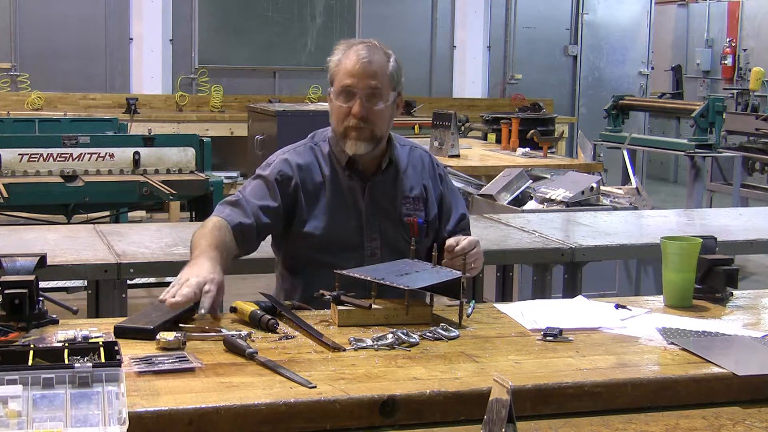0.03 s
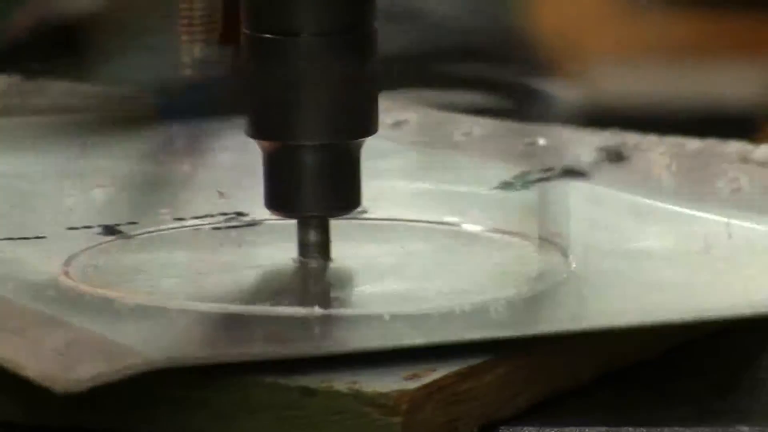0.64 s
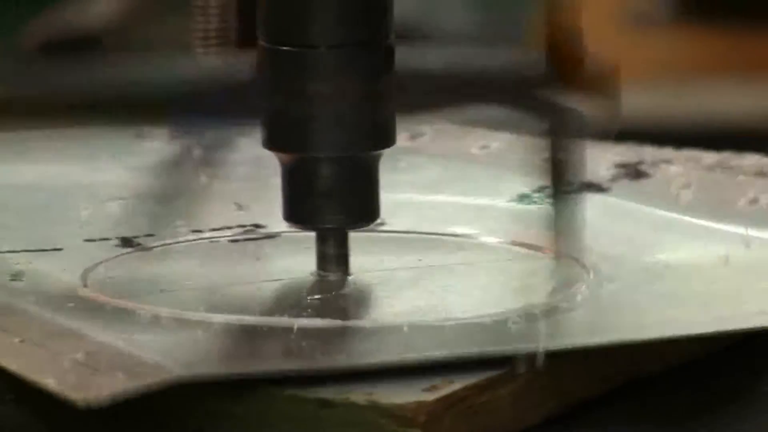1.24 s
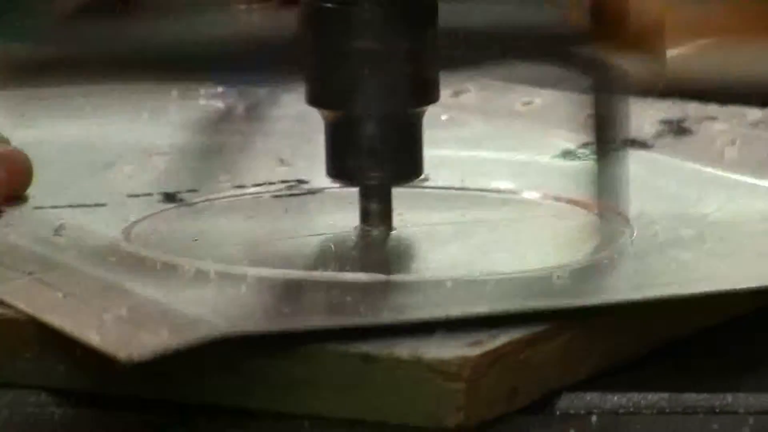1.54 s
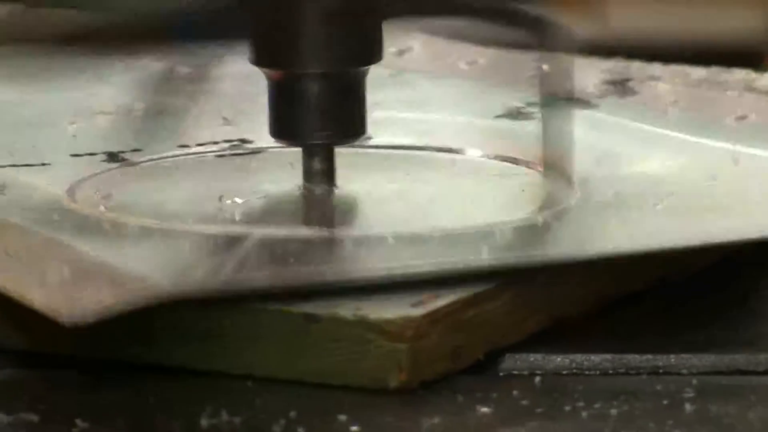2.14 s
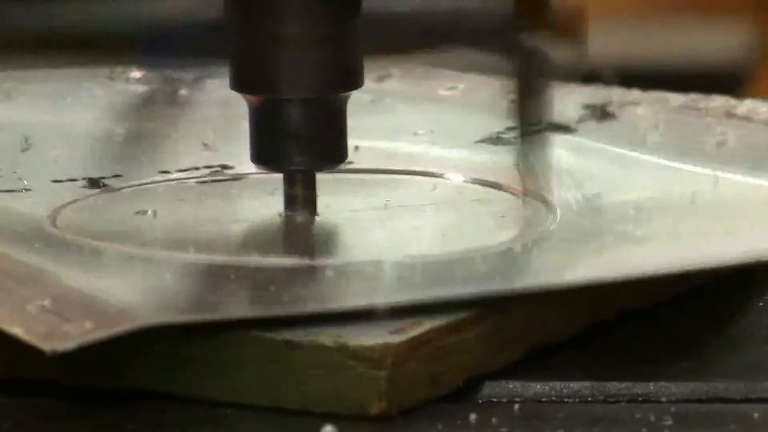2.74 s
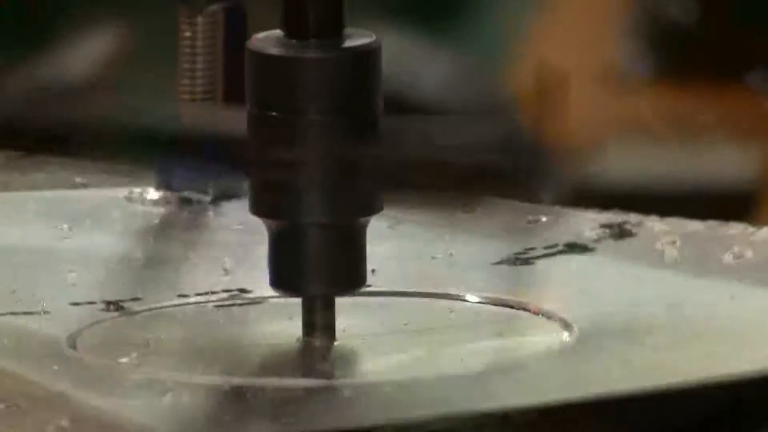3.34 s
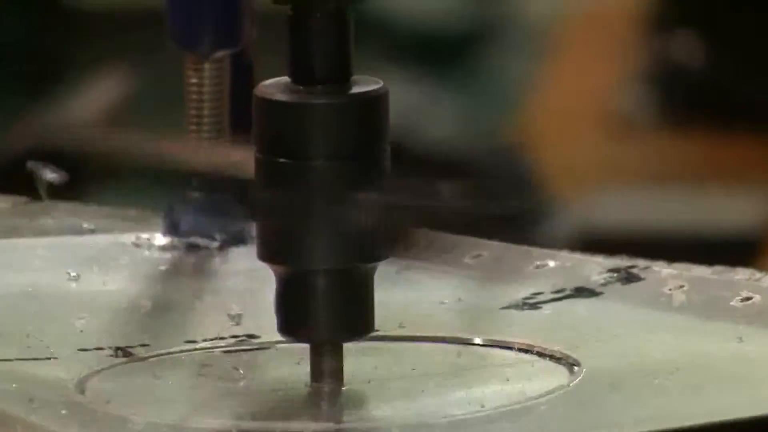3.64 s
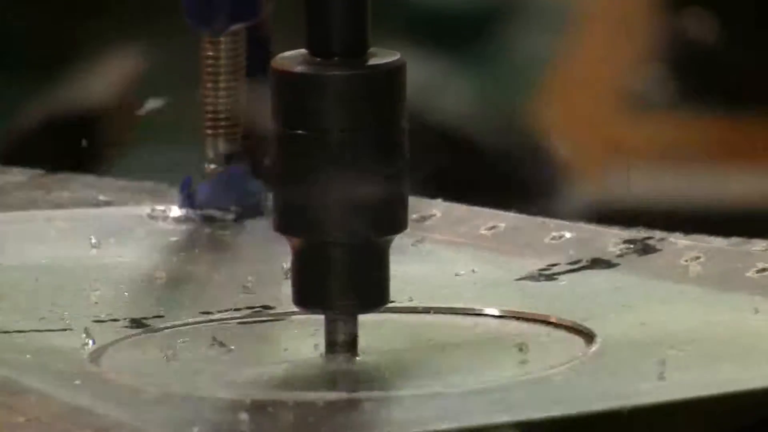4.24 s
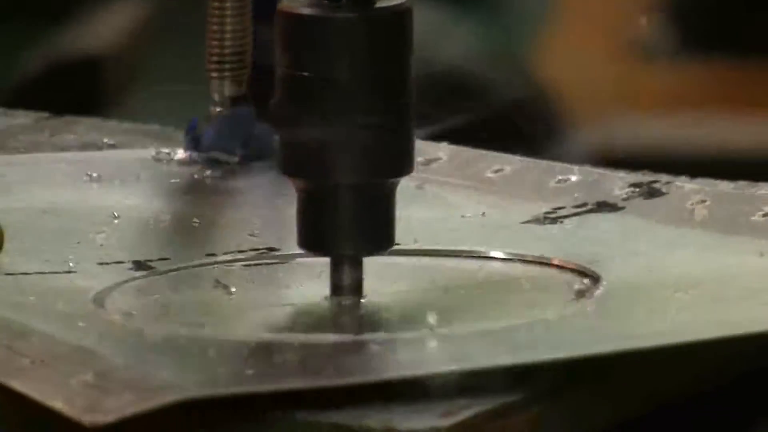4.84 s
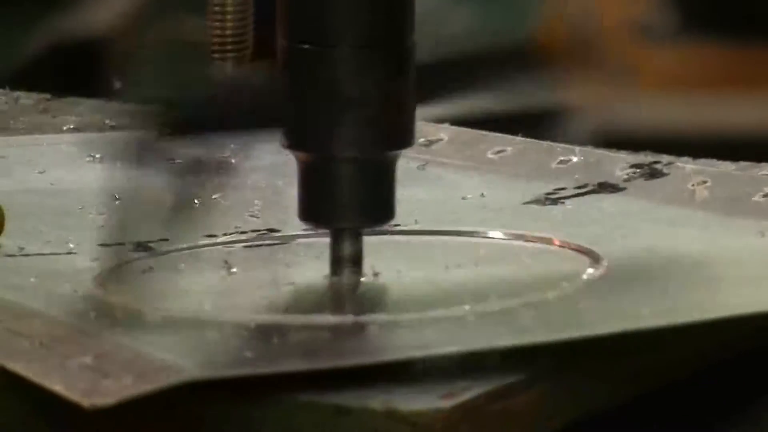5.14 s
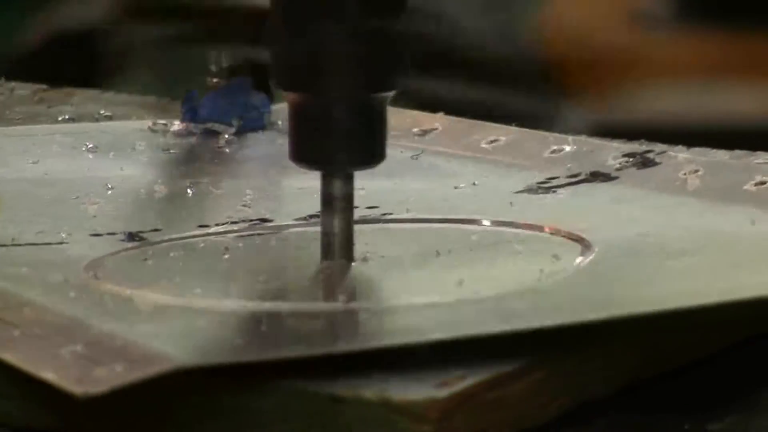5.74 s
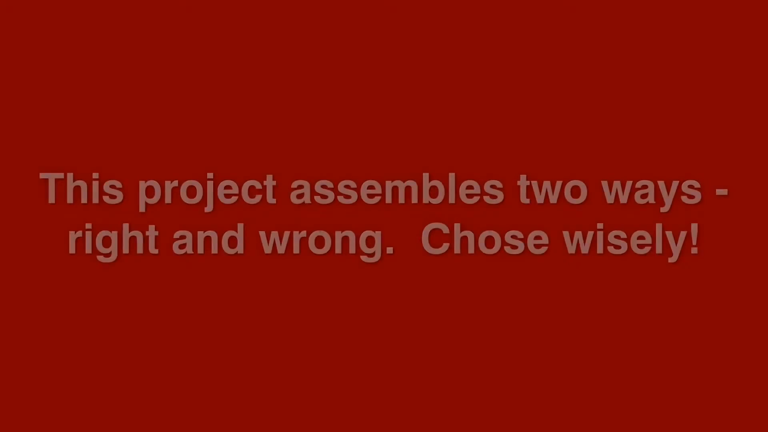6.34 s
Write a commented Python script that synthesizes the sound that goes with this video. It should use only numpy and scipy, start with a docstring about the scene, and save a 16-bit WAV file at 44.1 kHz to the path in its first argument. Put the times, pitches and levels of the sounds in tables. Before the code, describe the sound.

A faint electrical hum fills a workshop until, at about 0.4 seconds, a drill press comes in with a low rumble. At 0.5 seconds its cutter bites into a metal sheet and a loud, high-pitched squeal begins, close up. The squeal holds nearly one pitch and pulses about ten times a second, once with each turn. Beneath it are rasping, spurts of hissing chips, faint ringing from the sheet and the rattling machine. A sharp crackle comes at 3.7 seconds and a smaller one at 4.8. Just after 5 seconds the cutter breaks through and the squeal stops. From 5.1 to 5.6 seconds burrs rip off in bright crackles while the sheet chatters and the rumble grows much louder. The loose disc scrapes lightly several times between 5.6 and 6 seconds. The press keeps humming and rattling, then cuts off at 6.3 seconds.

```python
"""Fly cutter through sheet metal

A workshop hums with the mains, then a drill press starts and its fly cutter bites into a metal sheet.
The bit grabs at the same places of the groove on every turn and squeals at its own resonance, scraping
off chips. It breaks through: the squeal stops, burrs tear off, the sheet chatters, the loose disc rubs,
and the press rumbles on until the sound cuts off."""
import sys
import numpy as np
from scipy import signal
from scipy.fft import rfft, irfft
from scipy.io import wavfile

SR = 44100
rng = np.random.default_rng(int(sys.argv[2]) if len(sys.argv) > 2 else 0)


def dump(signal):
    """Clip the signal to [-1, 1] and save it as 16-bit WAV at the path in sys.argv[1]."""
    limited = np.clip(np.atleast_2d(signal).T, -1, 1)
    pcm = np.round(limited * 32767).astype(np.int16)
    wavfile.write(sys.argv[1], SR, pcm)


N = 286020
T = np.arange(N) / SR
HZ = np.maximum(np.fft.rfftfreq(N, 1 / SR), 1)
START_S, END_S = .411, 6.317   # the press runs
BITE_S, SQUEAL_END_S = .495, 5.065   # the bit bites; it breaks through

# The bit's three grabs per turn as the groove deepens: t/s, snap place/turns, snap level/dB,
# swell place/turns, swell width/turns, swell level/dB, far flare place/turns, far flare level/dB
GRABS = [(.55, .275, -8, .62, .3, -13.5, .94, -11), (1.0, .28, -10, .5, .28, -15, .857, -9),
         (1.3, .228, -9, .49, .18, -9, .876, -7.5), (1.7, .228, -7, .42, .14, -11.5, .85, -10),
         (2.1, .335, -7.5, .44, .22, -12, .875, -10), (2.3, .348, -5, .555, .08, -10.5, .894, -15.5),
         (3.0, .311, -3.5, .51, .06, -8.2, .85, -18), (4.15, .305, -6, .44, .08, -8, .92, -28),
         (4.45, .275, -8, .37, .09, -8.5, .956, -9.5), (5.03, .265, -6, .345, .1, -7.5, .917, -17)]
# Bright spectrum of chips and burrs leaving the edge: f/Hz, level/dB
CHIP_SPECTRUM = [(1500, -18.5), (3000, -2), (4500, 2), (5600, -2), (7000, 0.5), (9000, 0), (12000, -6.5),
                 (16000, -9.5)]


def from_db(db):
    """Decibels to gain."""
    return 10 ** (np.asarray(db) / 20)


def rms_one(x):
    """Scale to unit power."""
    return x / np.sqrt(np.mean(x ** 2) + 1e-20)


def in_time(rows):
    """Each column of a breakpoint table as a curve over time."""
    times, *columns = np.transpose(rows)
    return [np.interp(T, times, column) for column in columns]


def over_hz(points):
    """A breakpoint table as a curve over log frequency."""
    hz, value = np.transpose(points)
    return np.interp(np.log(HZ), np.log(hz), value)


def ramp(x):
    """A linear fade, held between zero and one."""
    return np.clip(x, 0, 1)


def between(start, end):
    """A gate with millisecond edges."""
    return ramp((T - start) * 1000) * ramp((end - T) * 1000)


def bell(x, width):
    """A smooth hump of height one around zero."""
    return np.exp(-(x / width) ** 2)


def stroke(start_s, length_s):
    """A short envelope with a fast attack and a rounded decay."""
    age = np.maximum(T - start_s, 0) / length_s
    return (1 - np.exp(-10 * age)) * np.exp(-age ** 2)


def drift(rate_hz):
    """Smooth random modulation of unit power, moving at about this rate."""
    return rms_one(irfft(rfft(rng.standard_normal(N)) / (1 + (HZ / rate_hz) ** 2), N))


def pan(db):
    """Left and right gains for a level difference; positive leans left."""
    return from_db(np.array([[db], [-db]]) / 2)


def noise():
    """Two independent white noises."""
    return rng.standard_normal((2, N))


def grains(per_s, spread_db):
    """Two independent trains of random clicks of uneven size."""
    sizes = from_db(spread_db * np.minimum(rng.exponential(1, (2, N)), 4))
    return rms_one(sizes * rng.choice([-1, 1], (2, N)) * (rng.random((2, N)) < per_s / SR))


def resonances(modes):
    """Response of damped modes in parallel, alternating in sign; rows of f/Hz, width/Hz, level/dB."""
    return sum((-1) ** k * from_db(db) / (1 + 1j * (HZ ** 2 - hz ** 2) / (HZ * width))
               for k, (hz, width, db) in enumerate(modes))


def radiate(force, response):
    """Two forces through one response, spread in stereo as mid and side; unit power."""
    # How alike the channels are: f/Hz, coherence/ratio
    coherence = [(60, 1), (600, 0.93), (1200, 0.8), (3000, 0.58), (12000, 0.25)]
    # Stereo balance: f/Hz, left minus right/dB
    balance = [(60, -19.5), (150, -4), (600, -1.3), (3000, -3), (15000, -1)]
    # Phase lead of the left channel: f/Hz, lead/rad
    left_lead = [(60, 4), (120, 1.5), (290, 0.69), (640, 0)]
    mid, side = rfft(force) * response
    alike = ramp(over_hz(coherence))
    pair = np.sqrt(1 + alike) * mid + np.sqrt(1 - alike) * side * [[1], [-1]]
    lean = from_db(over_hz(balance) / 2) * np.exp(.5j * over_hz(left_lead))
    return rms_one(irfft(pair * [lean, 1 / lean], N))


def workshop_reverb(x, t60):
    """Dense reflections that die away, different on each side."""
    t = T[:SR // 2]
    tails = rng.standard_normal((2, len(t))) * from_db(-60 * t / t60) * (t > .003)
    tails /= np.linalg.norm(tails, axis=1, keepdims=True)
    return signal.fftconvolve(x, tails, axes=1)[:, :N]


def turns_after(place):
    """Turns since the bit passed this place of the groove; negative as it approaches."""
    turn_s, turn_zero_s = .0995, .5185
    return ((T - turn_zero_s) / turn_s - place + .5) % 1 - .5


def since_snap():
    """Turns since the snap that opens the main grab."""
    return turns_after(in_time(GRABS)[0])


def quiet_shop(air_db, buzz_db):
    """Room tone before the press starts: mains hum, a thin buzz on every half cycle, and faint air."""
    # Hum lines: f/Hz, level/dB
    hum_lines = [(136, -54.5), (241, -42), (360.7, -50), (479.1, -52)]
    # Spectrum of the air noise: f/Hz, level/dB
    air_spectrum = [(30, -17), (100, -8), (137, 3), (190, -3.5), (1500, -18.5), (5700, -20), (8500, -33),
                    (15500, -34)]
    hum = sum(np.sqrt(2) * from_db(db) * np.sin(2 * np.pi * (hz * T + rng.random()))
              for hz, db in hum_lines)
    ticks = np.diff(np.floor(120 * T), prepend=0)
    buzz = rms_one(signal.sosfilt(signal.butter(2, [700, 5800], "band", fs=SR, output="sos"), ticks))
    buzz = rms_one(workshop_reverb(np.array([buzz, buzz]), t60=.13))
    air = rms_one(irfft(rfft(noise()) * from_db(over_hz(air_spectrum)), N))
    return (hum * pan(-5.5) + from_db(buzz_db) * buzz + from_db(air_db) * air) * between(0, START_S)


def press(rumble_db, table_db, motor_db, whine_db, knock_db, load_db, loose_db):
    """The motor hums; belt and spindle rattle the table and the sheet in small uneven knocks."""
    # Shaking of press and sheet from the bite on: t/s, level/dB
    shake = [(0.52, -37), (0.84, -30.5), (1.76, -36), (2.54, -31.5), (3.7, -33.5), (4.1, -28.5),
             (5.05, -29.5), (5.215, -16), (6.29, -22.5)]
    # Spectrum of the rumble: f/Hz, level/dB
    rumble_spectrum = [(30, -62), (122, -7.5), (167, -7.5), (355, -13.5), (629, -15), (1000, -25.5),
                       (1200, -17), (1650, -22.5), (4200, -35.5), (4540, -31), (15000, -63)]
    # Press table and clamped sheet: f/Hz, width/Hz, level/dB
    table_modes = [(138.4, 14, -0.5), (212.5, 7, 8), (234.8, 15, 6), (282, 47, 8), (572.7, 7.9, 6),
                   (705, 23, 3.5), (923.6, 37, -3.5), (1203, 16.5, -1.5)]
    # Motor hum: f/Hz, level/dB
    motor_lines = [(74.4, -17.5), (119.8, -0.5), (180, -15), (629.5, -11)]
    # The sheet, ringing loosely once cut through: f/Hz, width/Hz, level/dB
    loose_modes = [(452.4, 11, 0), (630, 24, 0), (1187, 7.3, -4), (1228, 9.8, -6)]
    # Whine of the spindle bearings: f/Hz, width/Hz, level/dB
    bearing_modes = [(5270, 25, -2.5), (6557, 25, -1.5)]
    idle_db = -20.5
    level_db = np.where(T < BITE_S, idle_db, in_time(shake)[0]) + .53 * duck_db() * (T > BITE_S)
    knocks = grains(1100, 3.86) * from_db(knock_db * drift(46))
    # soft knocks carry the bass, the smooth rush of belt and bearings the treble
    lowpass = 1 / (1 + (HZ / 1800) ** 2) ** 2
    force = irfft(rfft(knocks) * lowpass + rfft(noise()) * np.sqrt(1 - lowpass ** 2), N)
    rumble = from_db(rumble_db) * radiate(force, from_db(over_hz(rumble_spectrum)))
    table = from_db(table_db) * radiate(knocks, resonances(table_modes))
    # the clamped sheet drums while the bit bears on it
    load = from_db(load_db) * ramp((5.35 - T) / .27)
    drum = load * radiate(grains(1500, 5.6), resonances([(245.5, 171, 0)]) ** 2)
    hum = sum(from_db(db + 2 * drift(1.5)) * np.sin(2 * np.pi * hz * T + .5 * drift(3.08))
              for hz, db in motor_lines)
    loose = from_db(loose_db) * ramp((T - 5.15) / .55) * radiate(noise(), resonances(loose_modes))
    # the hum stands out before and after the cut, when the press runs free
    free_db = 5 * (ramp((T - 5.4) / .54) + (T < BITE_S))
    motor = from_db(motor_db + free_db) * radiate(np.array([hum, np.zeros(N)]), 1)
    whine = from_db(whine_db) * radiate(noise(), resonances(bearing_modes))
    return from_db(level_db) * (rumble + table + drum + loose + motor + whine) * between(START_S, END_S)


def duck_db():
    """Scrape and rumble duck once a turn under the loud squeal, most of all midway through the cut."""
    depth_db = (4 + 4 * bell(T - 3, .83)) * between(BITE_S, SQUEAL_END_S)
    dip = bell(((since_snap() - .15) / .2) ** 2, .83)   # flat-topped, just after the snap
    return depth_db * (.35 - dip)


def sticking(dip_db=7, width_turns=.07):
    """The bit sticks and falls quieter just before each snap."""
    return from_db(-dip_db * bell(since_snap() + width_turns, width_turns))


def grip(uneven_db):
    """Envelope of the bit's vibration in each turn: a snap, a swell, and a flare on the far side."""
    _, snap_db, swell_place, swell_width, swell_db, far_place, far_db = in_time(GRABS)
    rise_turns, fall_turns, far_turns = .022, .034, .07
    age = since_snap()
    snap = from_db(snap_db + uneven_db * drift(7.1)) * bell(age, np.where(age < 0, rise_turns, fall_turns))
    swell = from_db(swell_db + uneven_db * drift(7.1)) * bell(turns_after(swell_place), swell_width)
    far = from_db(far_db + uneven_db * drift(7)) * bell(turns_after(far_place), far_turns)
    # in the shallow groove the bit never quite stops squealing
    shallow = from_db(-20.5) * ramp((2.76 - T) / .63)
    first_squeak = from_db(-10) * bell(T - BITE_S, .01)
    sustain = np.hypot(swell, shallow) * sticking()
    return np.sqrt(snap ** 2 + far ** 2 + first_squeak ** 2 + sustain ** 2)


def squeal(jitter_hz, flutter_db, sway_rad, limit_db, room_db):
    """Stick-slip of the bit: one high tone, bent once a turn, with overtones when it swings hard."""
    # Base pitch of the squeal: t/s, f/Hz
    pitch = [(0.52, 3845), (1.2, 3800), (1.8, 3863), (2.18, 3870), (2.3, 3794), (3.9, 3826), (5.0, 3855)]
    # Overtones: multiple of the pitch, level/dB, left minus right/dB
    overtones = [(2, -13.5, -3), (3, -24.5, 0.5), (4, -33.5, -4)]
    # Raggedness of each overtone: phase jitter/rad
    overtone_jitter = [.28, .95, .85]
    age, biting = since_snap(), between(BITE_S, SQUEAL_END_S)
    drive = grip(uneven_db=.23) * biting
    bend_hz = 3.7 + 26.4 * np.cos(2 * np.pi * (age + .27))   # high before the grab, sagging in it
    bend_hz += 135 * bell(age + .11, .08)   # flicks up as the bit is about to catch
    bend_hz += 55 * bell(drive, .14) * drift(118)   # wavers when the swing is too weak to lock it
    phase = 2 * np.pi * np.cumsum(in_time(pitch)[0] + bend_hz + jitter_hz * drift(66)) / SR
    # the tone stutters until the groove guides the bit; a soft limit keeps the squeal's peaks even
    stutter_db = flutter_db + 3 * bell(T - BITE_S, 1.4)
    swing = from_db(limit_db) * np.tanh(drive * from_db(stutter_db * drift(180) - limit_db))
    # the whirling arm keeps changing the sound's path to each side
    paths = np.array([from_db(flutter_db * drift(100)) * np.exp(1j * sway_rad * drift(33))
                      for side in range(2)])
    tone = swing * np.real(paths * np.exp(1j * phase)) * pan(-7.5)
    # strain lifts the overtones between snap and swell, most in the deep groove
    strain_db = -14 + 4.5 * bell(T - 3.6, .8)
    strain = np.hypot(swing, from_db(strain_db) * bell(age - .11, .085) * biting)
    for (multiple, db, side_db), jitter in zip(overtones, overtone_jitter):
        overtone = from_db(3.7 * drift(180)) * np.exp(1j * (multiple * phase + jitter * drift(230)))
        tone += from_db(db) * strain * np.real(paths * overtone) * pan(side_db)
    return tone + lingering_ring() + from_db(room_db) * workshop_reverb(tone, t60=.18)


def lingering_ring():
    """A steady ring near 3.9 kHz lingers between squeals and fades after the breakthrough."""
    # Envelope of the ring: t/s, level/dB
    ring_levels = [(.5, -20.5), (5.02, -22.5), (5.08, -27.5), (5.35, -27), (6.0, -47)]
    # Peaks of the ring: f/Hz, width/Hz, level/dB
    ring_peaks = [(3880, 52.4, 2), (3792, 55, -5.5), (3983, 140, -11.5), (3665, 230, -11)]
    envelope = from_db(in_time(ring_levels)[0]) * between(BITE_S, END_S) * sticking()
    return envelope * radiate(grains(2500, 5.1), resonances(ring_peaks)) * pan(-2.7)


def scrape(rasp_db, hiss_db, rough_db):
    """Chips shear off in clumps of tiny snaps: a rasp from the sheet, a hiss from the edge."""
    # While the groove is cut: t/s, rasp level/dB, hiss level/dB
    cutting = [(0.52, -36, -39.5), (0.65, -37.5, -42), (0.9, -31.5, -39), (1.97, -39.5, -44),
               (2.37, -33, -42.5), (4.33, -36, -45), (5.03, -35, -44)]
    # While the disc tears free: t/s, rasp level/dB, hiss level/dB
    breakthrough = [(5.12, -31.5, -36.5), (5.35, -35, -27.5), (5.75, -28.5, -46.5)]
    # Spectrum of the scraped sheet: f/Hz, level/dB
    rasp_spectrum = [(290, -34), (500, -4), (634, -1.5), (754, -7), (986, -12), (1810, -4), (2310, -14.5),
                     (3300, -7), (4290, -19), (7260, -120)]
    rasp_level, hiss_level = in_time(np.vstack([cutting, breakthrough]))
    duck = duck_db()
    # each main grab opens with a spurt of chips; spurts grow and chips coarsen as the groove deepens
    spurt_db = 2 * T * bell(since_snap(), .13) * between(BITE_S, SQUEAL_END_S)
    force = grains(9000, 2.74) * from_db(rough_db * np.clip(T / 4, .5, 1.05) * drift(85))
    rasp = radiate(force, from_db(over_hz(rasp_spectrum)))
    rasp *= from_db(rasp_level + rasp_db + duck + .91 * spurt_db)
    hiss = radiate(force, from_db(over_hz(CHIP_SPECTRUM)))
    hiss *= from_db(hiss_level + hiss_db + .056 * duck + spurt_db)
    # the hiss ends when the disc parts from the sheet; its rim rasps a little longer
    parted_s, last_chip_s = 5.7, 6.046
    hiss *= ramp((parted_s - T) / .87)
    return (rasp + hiss) * between(BITE_S, END_S) * ramp((last_chip_s - T) / .23)


def sheet_song(mode_q):
    """The bit bows one resonance of the sheet after another; each swells once a turn."""
    # Bowed resonances: loudest t/s, spread/s, f/Hz, level/dB, place/turns
    bowed_modes = [(1.05, 0.52, 1820, -35.5, 0), (2.7, 0.27, 650, -31.5, 0.051),
                   (2.53, 0.9, 1790, -38, 0.0012), (3.8, .25, 3080, -29, 0.3), (4.12, 0.14, 615, -27, 0.25)]
    song = np.zeros((2, N))
    for peak_s, spread_s, hz, db, place in bowed_modes:
        ring = radiate(grains(3000, 1.6), resonances([(hz, hz / mode_q, 0)]) ** 2)
        song += from_db(db) * bell(T - peak_s, spread_s) * bell(turns_after(place), .31) * ring
    return song * between(BITE_S, END_S)


def burrs(crackle_db, ring_db, room_db):
    """Each burr rips off in a short bright crackle and flicks two modes of the sheet."""
    # Burrs torn off the edge: t/s, level/dB, length/s, low ring/dB, high ring/dB
    rips = [(3.6682, -15.5, 0.01, 0.5, -12), (4.797, -26.5, 0.023, 8.5, 8), (5.139, -32.5, 0.027, 14, -4),
            (5.241, -19, 0.028, 7.5, -0.5), (5.294, -19.5, 0.019, 4.5, -6),
            (5.3295, -17.5, 0.0072, -7.5, -12), (5.343, -12.5, 0.014, -3, -8), (5.429, -20, 0.019, -4, 7),
            (5.4424, -20.5, 0.0036, -2, 11), (5.447, -23.5, 0.014, 9.5, -3), (5.537, -13.5, 0.0092, -2, -3),
            (5.55, -16.5, 0.0079, 3.5, 2)]
    # Low and high ring of the flicked sheet: f/Hz, width/Hz, level/dB
    flicked_modes = [(1773, 260, 0), (2884, 390, 0)]
    tearing, flicks = np.zeros(N), np.zeros((2, N))
    for start_s, db, length_s, *rings_db in rips:
        rip = from_db(db) * stroke(start_s, length_s)
        tearing += rip
        flicks += np.outer(from_db(rings_db), rip)
    snaps = grains(3500, 3.5)
    crackle = from_db(crackle_db) * tearing * radiate(snaps, from_db(over_hz(CHIP_SPECTRUM)))
    for flick, mode in zip(flicks, flicked_modes):
        crackle += from_db(ring_db) * flick * radiate(snaps, resonances([mode]))
    return crackle + from_db(room_db) * workshop_reverb(crackle, t60=.16)


def disc_rubs(level_db):
    """The loose disc scrapes along the rim of the hole in a few short strokes."""
    # Strokes against the rim: t/s, level/dB
    rubs = [(5.627, -28.5), (5.71, -26), (5.8, -28.5), (5.822, -30), (5.957, -30)]
    envelope = sum(from_db(db) * stroke(start_s, length_s=.022) for start_s, db in rubs)
    return from_db(level_db) * envelope * radiate(grains(3000, 2), resonances([(2800, 2300, 0)]) ** 2)


def scene():
    """The quiet shop, then the press at work."""
    bit = squeal(jitter_hz=12, flutter_db=.8, sway_rad=.5, limit_db=-8.5, room_db=-15)
    chips = scrape(rasp_db=-1, hiss_db=7, rough_db=3) + burrs(crackle_db=-4, ring_db=-5.5, room_db=-10)
    metal = sheet_song(mode_q=8.6) + disc_rubs(level_db=1)
    machine = press(rumble_db=-3, table_db=-2.5, motor_db=-6.5, whine_db=-35.5,
                    knock_db=2.5, load_db=-4.5, loose_db=-6.5)
    return quiet_shop(air_db=-46.5, buzz_db=-49) + (bit + chips + metal + machine) * between(0, END_S)


def record(dry):
    """Soft clipping rounds the peaks; a steep low-pass cuts the very top."""
    cutoff_hz = 15850
    rounded = dry / (1 + dry ** 4) ** .25
    return signal.sosfilt(signal.ellip(10, .1, 80, cutoff_hz, fs=SR, output="sos"), rounded)


dry = scene()
out = record(dry)
dump(out)
```